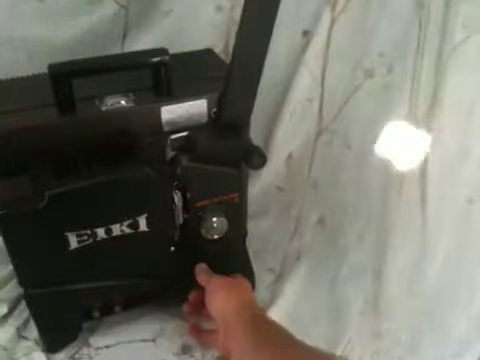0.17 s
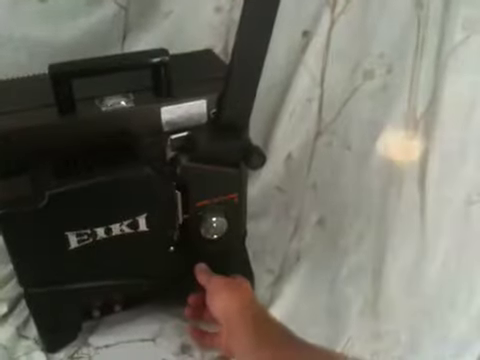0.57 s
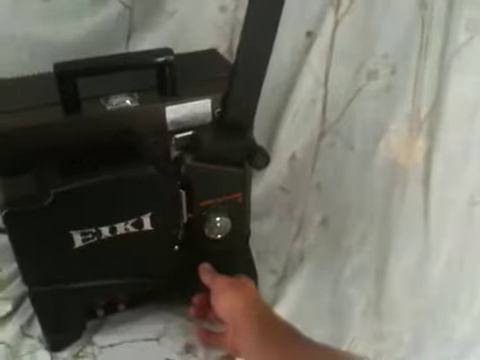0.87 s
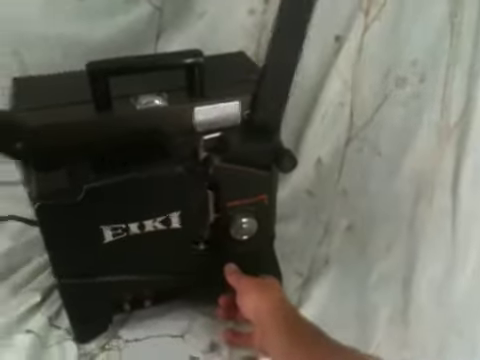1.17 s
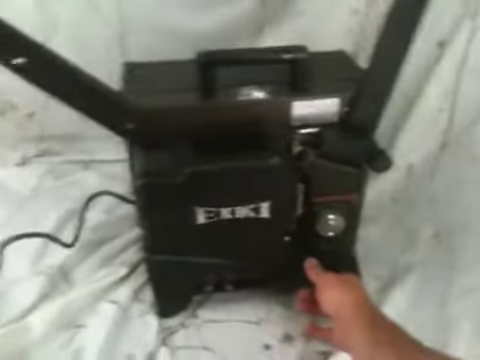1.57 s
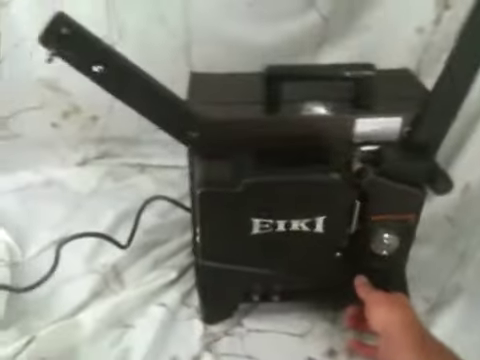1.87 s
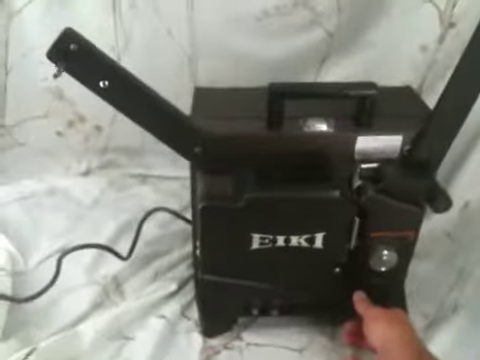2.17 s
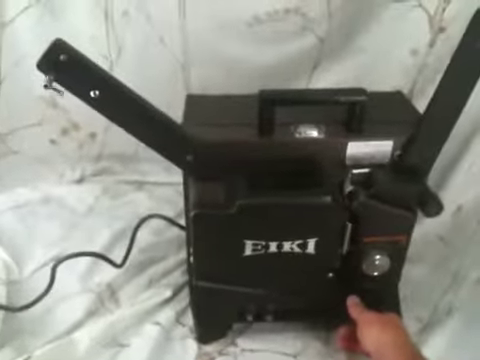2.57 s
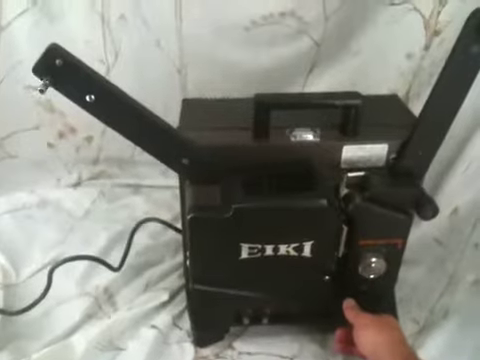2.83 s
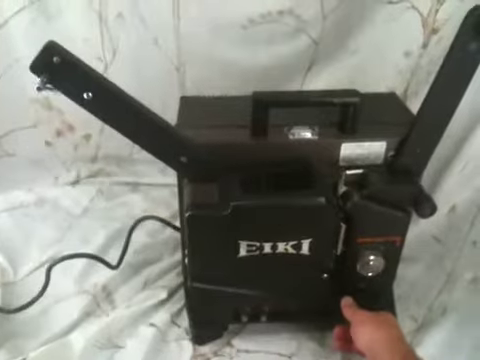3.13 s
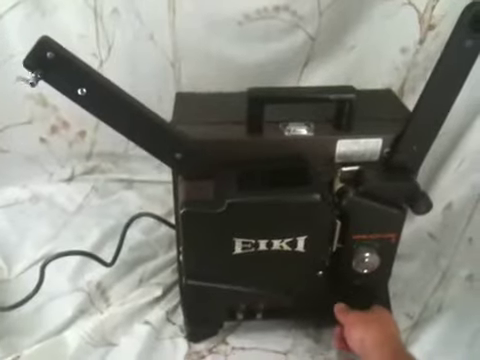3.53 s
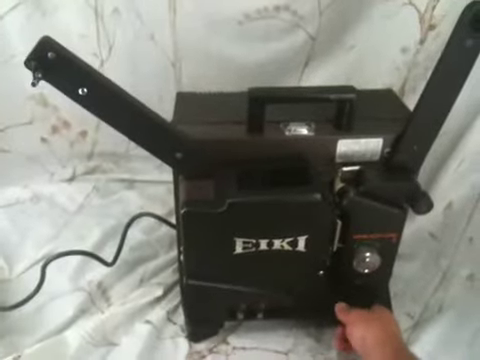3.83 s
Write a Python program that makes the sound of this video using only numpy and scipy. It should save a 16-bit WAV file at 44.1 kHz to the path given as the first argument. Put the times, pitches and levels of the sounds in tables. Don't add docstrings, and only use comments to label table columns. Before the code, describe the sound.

A film projector motor whirs and ticks rapidly, then a switch clicks and it coasts down.

```python
import sys
import numpy as np
from scipy import signal
from scipy.fft import rfft, irfft
from scipy.io import wavfile
from scipy.ndimage import uniform_filter1d

SR = 44100
rng = np.random.default_rng(int(sys.argv[2]) if len(sys.argv) > 2 else 0)


def digitize_waveform(pressure):
    field = np.atleast_2d(pressure).T
    bounded = np.clip(field, -1, 1)
    quanta = np.round(bounded * 32767).astype(np.int16)
    wavfile.write(sys.argv[1], SR, quanta)


def boost_factor(decibels):
    exponent = np.asarray(decibels, float) / 20
    return 10 ** exponent


N = 176400

SHAFT_HZ = 22.39
OFF_S = 3.29


def unit(x):
    return x / np.sqrt(np.mean(x ** 2))


def noise():
    return rng.standard_normal(N)


def ring(x, hz, width_hz):
    b, a = signal.iirpeak(hz, hz / width_hz, fs=SR)
    return signal.lfilter(b, a, x) * np.sqrt(SR / (np.pi * width_hz))


def walk(rate):
    k = int(SR / rate)
    steps = np.repeat(rng.standard_normal(N // k + 1), k)
    return unit(uniform_filter1d(uniform_filter1d(steps, k), k)[:N])


def bump(t, centre, length):
    return np.exp(-.5 * ((t - centre) / length) ** 2)


def hiss(shape, flicker_db):
    f = np.maximum(np.arange(N // 2 + 1) * SR / N, 1)
    hz, db = np.transpose(shape)
    spec = rfft(noise()) * boost_factor(np.interp(np.log(f), np.log(hz), db))
    band = np.clip(2 * np.log2(f / 60), 0, 16)
    out = 0
    for b in range(17):
        share = np.clip(1 - abs(band - b), 0, 1)
        out = out + irfft(spec * share, N) * boost_factor(flicker_db * walk(8.99))
    return unit(out)


def room_floor(t):
    # (frequency [Hz], level [dB per Hz])
    floor_colour = [(30, -34), (90, -9), (220, 1), (780, -1), (1200, -9), (7000, -13.5), (12500, -16.5),
                    (15700, -20)]
    mains_hz, mains_db = 241.3, -69.5
    return boost_factor(-66.5) * hiss(floor_colour, 0.32) + boost_factor(mains_db) * np.sin(2 * np.pi * mains_hz * t)


def motion(t):
    gain_hz_per_s, first_tick_s = .043, .1081
    coast_s, load_hold_s, load_release_s = .55, 0.026, 0.066
    speed = np.exp(-np.maximum(t - OFF_S, 0) / coast_s)
    turns = np.cumsum((SHAFT_HZ + gain_hz_per_s * (t - first_tick_s)) * speed) / SR
    load = np.exp(-np.maximum(t - OFF_S - load_hold_s, 0) / load_release_s)
    return speed, turns - turns[int(first_tick_s * SR)], load


def roar(speed, load):
    # (frequency [Hz], level [dB per Hz])
    roar_colour = [(60, -76), (150, -5.5), (500, -1), (760, 4.5), (1250, -14.5), (4500, -17), (8000, -18),
                   (10000, -29)]
    # (frequency [Hz], width [Hz], level [dB])
    case_panels = [(181, 47, -58.5), (378.6, 10.7, -61.5), (599.8, 14, -57.5), (706, 104, -55.5),
                   (794, 26, -55), (1023, 23, -73), (1555, 58, -57.5), (2585, 38, -64.5), (4500, 130, -64),
                   (5195, 71, -63), (6064, 140, -64)]
    roar_db, flicker_db, coast_db, speed_power = -45.5, 1, -2, 2.68
    panels = 0
    for hz, width_hz, db in case_panels:
        panels = panels + boost_factor(db + 2.4 * walk(3.86)) * ring(noise(), hz, width_hz)
    gain = speed ** speed_power * (load + (1 - load) * boost_factor(coast_db))
    return gain * (boost_factor(roar_db) * hiss(roar_colour, flicker_db) + panels)


def gears(t, turns, load):
    tooth_counts = [8, 34, 35, 37, 44, 46, 56]
    tooth_levels = [-58, -51, -44, -51.5, -63, -55, -74.5]
    droop = .15
    rotor_hz, rotor_db = 685., -50.5
    cut = int(OFF_S * SR)
    free = turns[cut] + (t - OFF_S) * (turns[cut] - turns[cut - 1]) * SR
    turns = np.where(t > OFF_S, free + droop * (turns - free), turns)

    def tone(cycles, db, slip_rad):
        level = boost_factor(db + 0.5 + 1 * walk(8.2))
        return level * np.sin(2 * np.pi * cycles + slip_rad * walk(10))

    out = tone(rotor_hz / SHAFT_HZ * turns, rotor_db, 0.86)
    for count, db in zip(tooth_counts, tooth_levels):
        out = out + tone(count * turns, db, 0.67)
    return load * out


def cam(t, speed, turns):
    # (frequency [Hz], width [Hz], level [dB], decay [s])
    tick_parts = [(6050, 870, -63, 0.0037), (7650, 650, -62.5, 0.0051), (5140, 850, -63, 0.0044),
                  (3850, 420, -74, 0.0024), (8770, 2500, -75, 0.0041), (11600, 6900, -74, 0.004)]
    tick_delays = [-.0045, -.0012, -.001, .0008, -.0005, 0]
    scatter_db, snap, speed_power = 1, 7, 4.2
    times = np.interp(np.arange(np.ceil(turns[0]), turns[-1]), turns, t)
    out = 0
    for (hz, width_hz, db, decay), delay in zip(tick_parts, tick_delays):
        pulses = np.zeros(N)
        pulses[((times + delay) * SR).astype(int)] = boost_factor(scatter_db * rng.standard_normal(len(times)))
        rattle = signal.lfilter([1], [1, -np.exp(-1 / (decay * SR))], pulses) * noise()
        part = ring(ring(rattle + snap * pulses, hz, width_hz), hz, 2.0 * width_hz)
        out = out + boost_factor(db) * unit(part)
    return out * speed ** speed_power


def belt_rubs(t):
    # (centre [s], level [dB])
    post = [(0.081, -49), (0.214, -48), (0.291, -60), (0.355, -51), (0.494, -52.1), (0.561, -53.6),
            (0.625, -58), (0.693, -58), (0.766, -52), (0.833, -46), (0.898, -53), (0.972, -51.5),
            (1.038, -57), (1.107, -51.5), (1.168, -50.5), (1.243, -56), (1.309, -52), (1.38, -50.2),
            (1.447, -54.3), (1.514, -48.5), (1.586, -58), (1.652, -49.5), (1.721, -52.7), (1.789, -56),
            (1.857, -56.5), (1.925, -55), (1.992, -51.5), (2.053, -57), (2.13, -50), (2.19, -52.5),
            (2.265, -53), (2.323, -52), (2.395, -56), (2.466, -56), (2.534, -49), (2.605, -53.7),
            (2.672, -53), (2.809, -53.5), (2.936, -57), (3.071, -54), (3.216, -55)]
    # (centre [s], level [dB])
    bracket = [(0.152, -58), (0.203, -58), (0.27, -62), (0.341, -58), (0.419, -58), (0.483, -61.2),
               (0.554, -56), (0.647, -58.6), (0.691, -60.5), (0.823, -60.1), (0.891, -59.8), (0.964, -55.5),
               (1.015, -60.1), (1.105, -60.0), (1.156, -58), (1.235, -60), (1.29, -61.5), (1.428, -58.5),
               (1.5, -63), (1.571, -65), (1.63, -61.1), (1.698, -60.0), (1.774, -55.6), (1.84, -59),
               (1.982, -60), (2.042, -62), (2.118, -60), (2.173, -54), (2.249, -64), (2.385, -59.5),
               (2.582, -61), (2.73, -61), (2.793, -61.3), (2.854, -59), (2.923, -56), (2.99, -61.0),
               (3.129, -63), (3.202, -59)]
    # (centre [s], level [dB])
    guide = [(0.311, -50.5), (0.454, -51.5), (0.524, -51), (0.59, -51), (0.653, -57.3), (0.726, -52),
             (0.864, -50), (1.005, -56), (1.123, -54.9), (1.277, -54), (1.339, -57), (1.409, -50.5),
             (1.544, -54.7), (1.604, -56), (1.678, -55.4), (1.748, -51), (1.797, -55.6), (1.875, -53.3),
             (1.951, -55), (2.159, -55), (2.297, -55.4), (2.358, -59), (2.431, -60), (2.565, -52.8),
             (2.608, -54), (2.702, -54.5), (2.767, -51), (2.834, -51), (2.904, -52), (2.971, -57),
             (3.037, -54.5), (3.088, -52.5), (3.242, -51.5)]
    # (centre [s], level [dB])
    cover = [(0.312, -60), (0.588, -58), (0.725, -58), (0.865, -63), (1.122, -61), (1.339, -61),
             (1.409, -55), (1.478, -62), (1.686, -61), (1.747, -56), (1.869, -68), (1.955, -60),
             (2.158, -58), (2.227, -50.5), (2.299, -56), (2.358, -53), (2.434, -58), (2.494, -58),
             (2.566, -54.1), (2.63, -54.7), (2.704, -56), (2.773, -51.9), (2.839, -55), (2.908, -49),
             (2.973, -58), (3.02, -55.1), (3.105, -54), (3.162, -49), (3.246, -52.2)]
    # (frequency [Hz], rub length [s], murmur level [dB])
    singing_modes = [(2080, 0.0046, -63), (3150, 0.0079, -67), (4410, 0.01, -63.5), (4185, 0.0077, -60.5)]
    width_hz, wander_rad, roughness, fade_s = 105, 1.75, 0.56, 0.082
    out = 0
    for rubs, (hz, length, db) in zip((post, bracket, guide, cover), singing_modes):
        gate = sum(boost_factor(peak) * bump(t, centre, length) for centre, peak in rubs)
        murmur = boost_factor(db) * np.exp(-np.maximum(t - OFF_S, 0) / fade_s)
        tone = np.sqrt(2) * np.sin(2 * np.pi * hz * t + wander_rad * walk(60))
        scrape = ring((roughness * gate + murmur) * noise(), hz, width_hz)
        out = out + gate * tone + scrape
    return out


def passing_hums(t):
    # (frequency [Hz], level [dB], centre [s], length [s])
    humming = [(1060, -51, 3.37, 0.012), (1072, -55.5, 3.45, 0.025), (820, -51, 3.43, 0.023),
               (718, -60, 3.58, 0.032), (376, -56, 3.38, 0.027), (380, -63, 3.58, 0.043),
               (715, -64.5, 3.8, .03), (706, -66, 3.76, .03), (795, -63.5, 3.58, 0.031),
               (1050, -61, 4.8, 0.04), (1040, -68.5, 3.75, 0.036)]
    out = 0
    for hz, db, centre, length in humming:
        out = out + boost_factor(db) * bump(t, centre, length) * np.sin(2 * np.pi * hz * t + 1.6 * walk(25))
    return out


def coasting_squeaks(t):
    # (centre [s], length [s], frequency [Hz], level [dB])
    squeak_events = [(3.435, .008, 2090, -63), (3.508, 0.011, 3150, -56.5), (3.5, .008, 5450, -63),
                     (3.573, .014, 6100, -62), (3.582, 0.0072, 4410, -57), (3.637, .008, 2300, -64),
                     (3.652, .012, 3150, -64), (3.657, .01, 2070, -61), (3.66, 0.018, 6100, -68),
                     (3.727, 0.0092, 3150, -61), (3.735, 0.01, 6100, -60), (3.737, 0.0073, 2480, -59),
                     (3.749, 0.011, 2050, -62), (3.804, 0.011, 2150, -67), (3.827, 0.019, 2480, -61),
                     (3.839, 0.013, 6100, -60.5), (3.838, 0.0086, 5450, -55), (3.827, .025, 4410, -74),
                     (3.943, 0.016, 2050, -64), (3.944, 0.0083, 4410, -66.5), (3.967, .014, 3150, -67),
                     (3.983, .012, 5450, -67), (3.99, 0.012, 1900, -61)]
    flutter_db, rough = 2.5, 0.96
    level_wander, phase_wander = rough * walk(150), rough * walk(90)
    out = 0
    for centre, length, hz, db in squeak_events:
        level = boost_factor(db + 1.5 + flutter_db * level_wander)
        out = out + level * bump(t, centre, length) * np.sin(2 * np.pi * hz * t + 2 * phase_wander)
    return out


def coasting_scrapes(t):
    # (centre [s], length [s], low modes [dB], middle modes [dB], high modes [dB])
    slow_rubs = [
        (3.384, .03, -75, -54.5, -72),
        (3.436, 0.031, -61.5, -57, -74),
        (3.495, 0.049, -63, -62, -62),
        (3.568, 0.045, -60, -60.5, -60),
        (3.641, 0.061, -60, -61, -61),
        (3.733, 0.041, -62, -63, -61),
        (3.83, 0.05, -62, -72, -69),
        (3.945, 0.026, -66.5, -72, -73),
        (3.979, 0.037, -63.5, -80, -65),
    ]
    # (frequency [Hz], width [Hz], level [dB], lag [rub lengths])
    frame_modes = [
        [(717, 55, -8, 0.067), (1057, 28, -11, 0.055), (1530, 90, -3, 0.025), (2150, 260, -1.5, 0.086),
         (2940, 350, -6.5, -0.092)],
        [(4200, 170, 1, .2), (4410, 140, -8, 2.95)],
        [(5400, 500, -6.5, 0.087), (6100, 190, -12, 0), (8050, 900, -11, 0.0099)],
    ]
    scatter_db = 2.5
    out = 0
    for group, modes in enumerate(frame_modes):
        for hz, width_hz, db, lag in modes:
            gate = 0
            for centre, length, *levels in slow_rubs:
                level = boost_factor(levels[group] + db + scatter_db * rng.standard_normal())
                gate = gate + level * bump(t, centre + lag * length, 0.4 * length)
            out = out + ring(gate * noise(), hz, width_hz)
    return out


def switch(t):
    # (time [s], level [dB], decay [s])
    contacts = [
        (.031, -41, 0.0042),
        (0.0354, -32, 0.0047),
        (0.044, -45, 0.0044),
        (3.279, -44, 0.004),
        (3.2819, -25.5, 0.0042),
        (3.2833, -26.5, 0.0018),
        (3.2845, -33, 0.0012),
        (3.289, -42, 0.0044),
        (3.299, -52, 0.0045),
    ]
    # (frequency [Hz], width [Hz], level [dB])
    switch_modes = [(2220, 450, -4), (3030, 290, -6), (4270, 520, 0.5), (5600, 310, -9), (6350, 520, 2.5),
                    (8600, 930, -4.5), (12200, 920, -12), (15000, 1500, -18)]
    snap, thump_hz, thump_db = 7.3, 45., -52
    gate = 0
    for start, db, decay in contacts:
        gate = gate + boost_factor(db) * (t >= start) * np.exp(-np.maximum(t - start, 0) / decay)
    knocks = snap * np.maximum(np.diff(gate, prepend=0), 0)
    out = boost_factor(thump_db) * ring(gate, thump_hz, 37.0)
    for k, (hz, width_hz, db) in enumerate(switch_modes):
        sign = (-1) ** k
        out = out + boost_factor(db - 7.0) * sign * ring(gate * noise() + knocks, hz, width_hz)
    return out


def room_tail(t, hits):
    t60_s, room_db = 0.085, -13
    tail = rng.standard_normal(SR // 4) * boost_factor(-60 * t[:SR // 4] / t60_s)
    return boost_factor(room_db) * signal.fftconvolve(hits, tail / np.sqrt(np.sum(tail ** 2)))[:N]


def facing(t, x):
    # (time [s], treble [dB], panels [dB])
    swing = [
        (0, -1.5, 1),
        (.9, -1.5, 0.5),
        (1.6, -1, 0.5),
        (2.0, 0, 1.5),
        (2.3, 0, 1.5),
        (2.8, -1, 1.5),
        (3.3, -1, 2),
        (4, 0, -3.5),
    ]
    times, treble_db, panel_db = np.transpose(swing)
    treble = boost_factor(np.interp(t, times, treble_db))
    panel = boost_factor(np.interp(t, times, panel_db))
    high = signal.sosfiltfilt(signal.butter(2, 3500., "high", fs=SR, output="sos"), x)
    low = signal.sosfiltfilt(signal.butter(2, 1250., "low", fs=SR, output="sos"), x)
    return low + panel * (x - low - high) + treble * high


def treble_dips(x):
    # (frequency [Hz], chance bias [spreads])
    dip_bias = [(8300, -3), (9600, -.6), (10300, -1), (12250, -.2), (12700, -.6), (13500, -.1),
                (14500, -.9), (15300, -.5)]
    dip_db, dip_bins, dip_frames = -22, 4, 5
    f, _, z = signal.stft(x, SR, nperseg=1024)
    field = rng.standard_normal(z.shape)
    for _ in range(2):
        field = uniform_filter1d(field, dip_bins, axis=0)
        field = uniform_filter1d(field, dip_frames, axis=1)
    bias = np.interp(f, *np.transpose(dip_bias))[:, None]
    depth = np.clip(2 * (unit(field) + bias - .5), 0, 1)
    return signal.istft(z * boost_factor(dip_db * depth), SR, nperseg=1024)[1][:N]


def scene():
    t = np.arange(N) / SR
    speed, turns, load = motion(t)
    hits = cam(t, speed, turns) + belt_rubs(t) + switch(t)
    hits = hits + passing_hums(t) + coasting_squeaks(t) + coasting_scrapes(t)
    machine = roar(speed, load) + gears(t, turns, load) + hits + room_tail(t, hits)
    return treble_dips(facing(t, machine) + room_floor(t))[None]


def band_limit(x):
    return signal.sosfilt(signal.butter(12, 15740, fs=SR, output="sos"), x)


def record(dry):
    x = signal.sosfilt(signal.butter(1, 192, "high", fs=SR, output="sos"), dry)
    x = signal.sosfilt(signal.ellip(10, .3, 60, 15740, fs=SR, output="sos"), x)
    return band_limit(x)


dry = scene()
out = record(dry)
digitize_waveform(out)
```